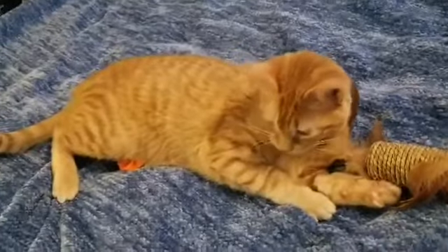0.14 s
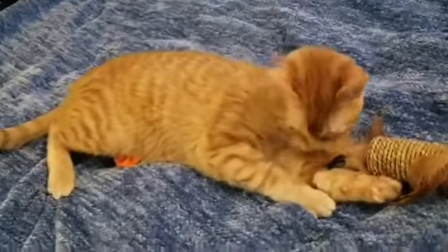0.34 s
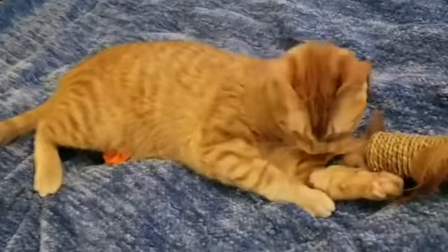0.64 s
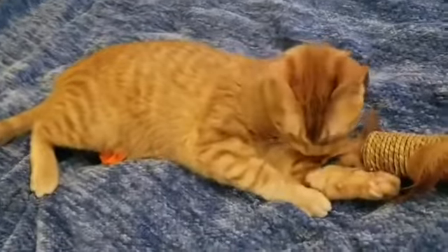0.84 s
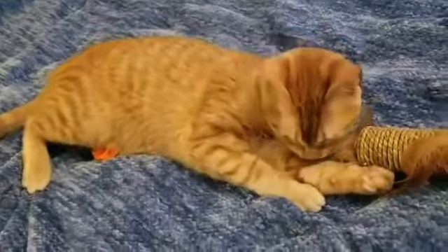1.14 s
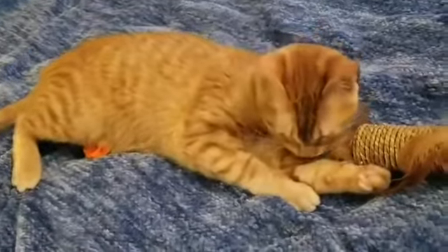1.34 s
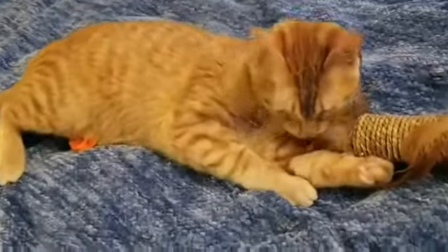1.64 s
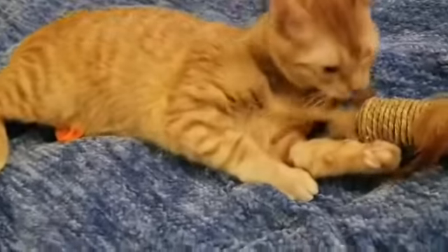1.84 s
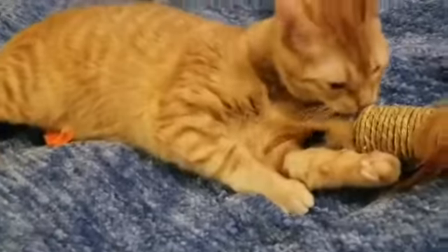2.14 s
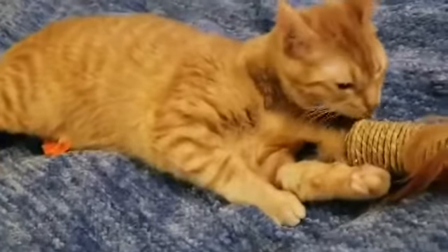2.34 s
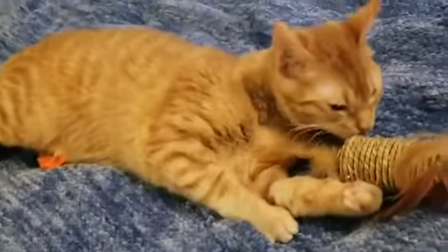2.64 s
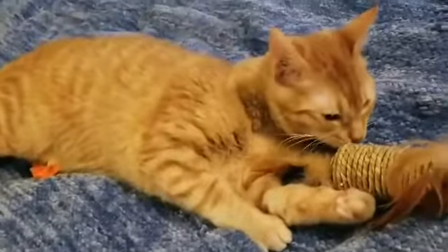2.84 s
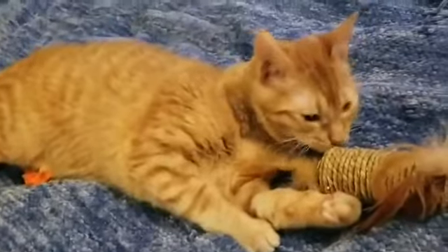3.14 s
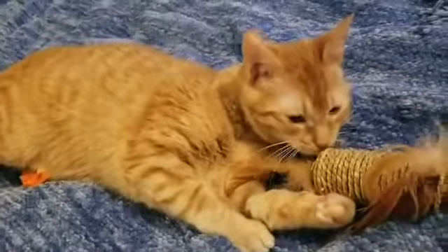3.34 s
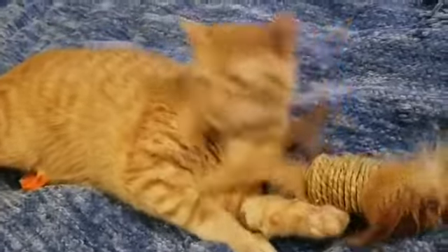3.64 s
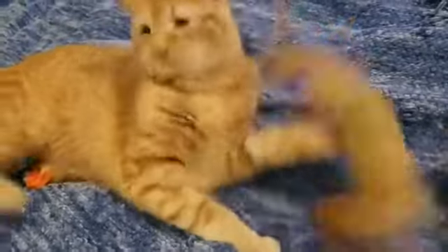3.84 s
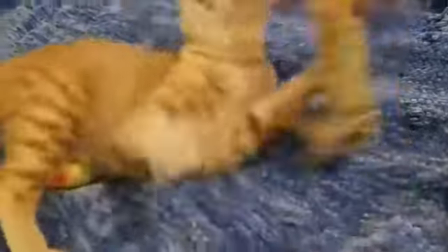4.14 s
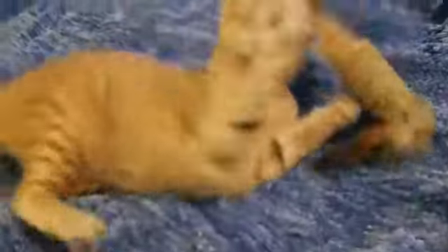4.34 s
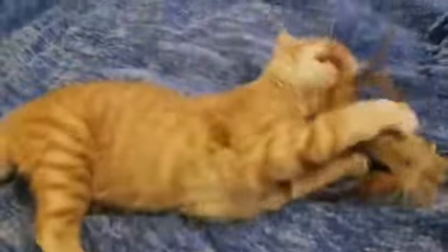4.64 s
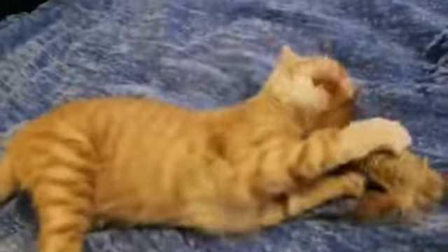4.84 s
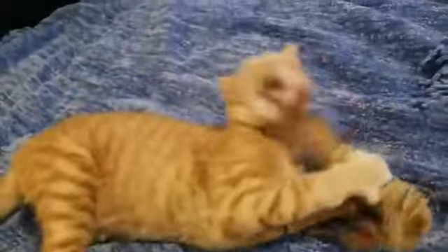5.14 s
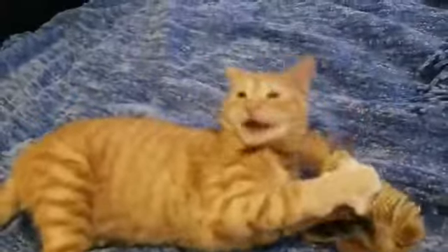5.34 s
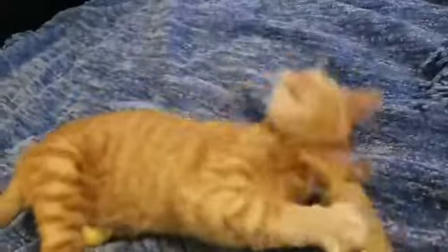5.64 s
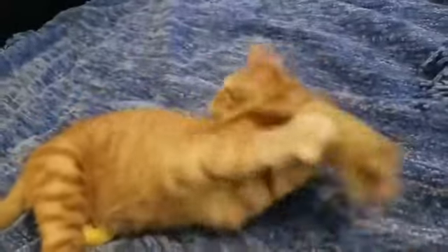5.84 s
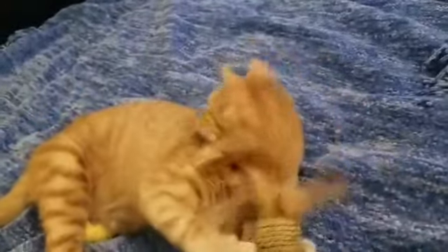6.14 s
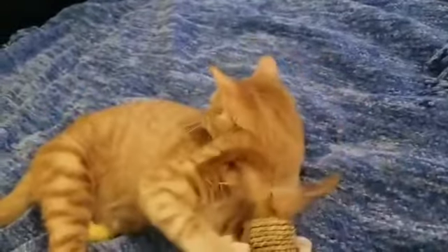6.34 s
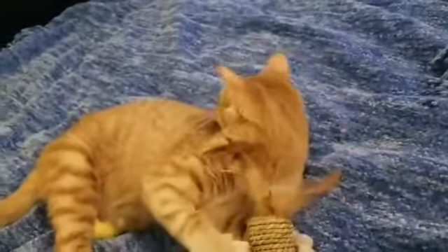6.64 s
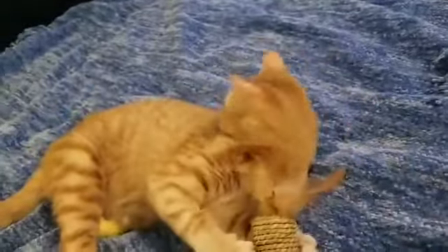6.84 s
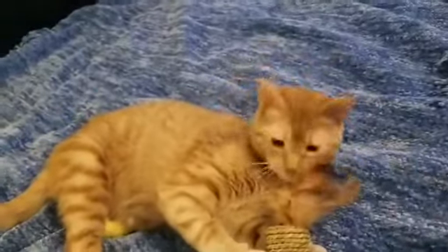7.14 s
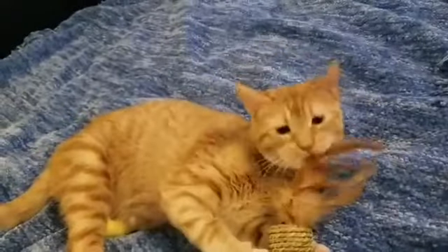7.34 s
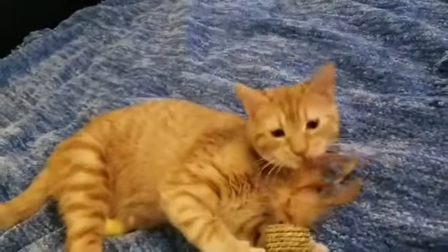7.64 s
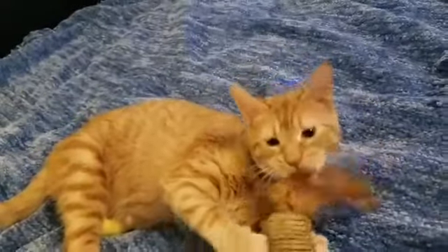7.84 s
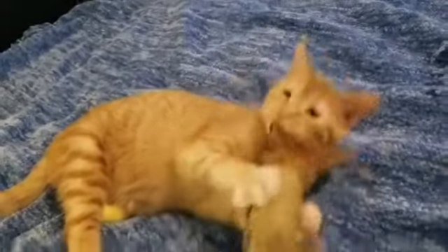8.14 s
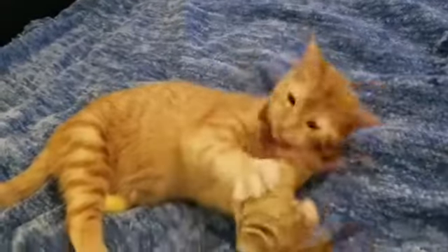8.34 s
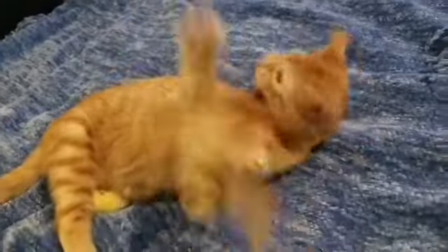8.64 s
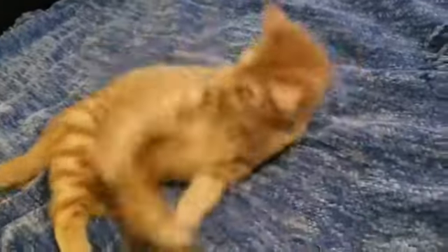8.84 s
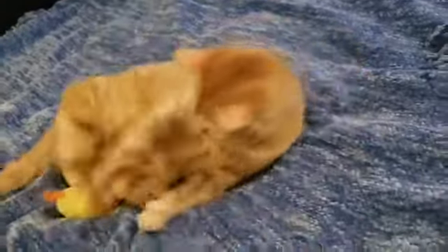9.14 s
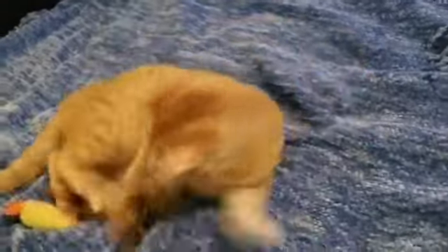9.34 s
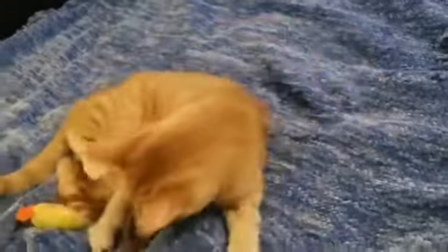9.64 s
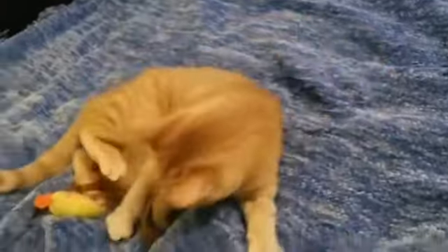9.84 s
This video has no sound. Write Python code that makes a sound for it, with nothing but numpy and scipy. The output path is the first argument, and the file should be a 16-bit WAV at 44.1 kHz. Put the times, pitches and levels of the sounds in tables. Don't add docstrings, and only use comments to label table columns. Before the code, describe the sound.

Very close in a quiet room with a faint low fridge hum, a kitten licks and picks at a rope toy. Tiny bright bell tinkles and dry ticks come first, then a soft bed thud and a lull. Claws snap fibres with stronger jingling, fabric scuffs follow, then teeth crackle through rope with dense jingles, and finally sharp snaps and rustling without bell.

```python
import sys
import numpy as np
from scipy import signal
from scipy.fft import rfft, irfft
from scipy.io import wavfile
from scipy.ndimage import uniform_filter1d

SR = 44100
rng = np.random.default_rng(int(sys.argv[2]) if len(sys.argv) > 2 else 0)


def to_linear_factor(level_db):
    exponent = np.asarray(level_db, float) / 20
    return 10 ** exponent


def persist_wave(psi):
    counts = np.round(np.clip(psi, -1, 1) * 32767).astype(np.int16)
    wavfile.write(sys.argv[1], SR, np.atleast_2d(counts).T)


N = 440118

# frequency in Hz, amplitude in dB.
HUM_PARTIALS = [(119.2, -53), (57, -72.5)]
# frequency in Hz, density in dB per Hz.
AIR_SPECTRUM = [(20, -23), (45, -4), (100, 1.5), (170, -13.5), (300, -13.5), (500, -29.5), (1000, -38),
                (16000, -32)]
# start in seconds, length in seconds, level in dB.
WEIGHT_SHIFTS = [(0.0, 0.0086, -46), (0.483, 0.044, -52.5), (1.49, 0.17, -52), (1.702, 0.079, -45),
                 (2.14, 0.023, -50), (2.37, 0.042, -47.5), (4.005, 0.14, -54.5), (4.39, 0.083, -52),
                 (5.148, 0.098, -58.5), (5.365, 0.042, -54), (6.855, 0.036, -48.5), (7.39, 0.015, -49.5)]
# start in seconds, peak in dB, 60 dB decay time in seconds.
BED_BUMPS = [
    (0.655, -40, 0.19),
    (2.126, -35, 0.26),
    (2.346, -23, 0.22),
]
# start in seconds, length in seconds, fur level in dB,
# body level relative to the fur in dB.
DRAG_STROKES = [(0.0, 0.0063, -46, -4), (0.345, 0.2, -57, 1), (0.663, 0.016, -51, 13.5),
                (0.752, 0.19, -56.5, 1), (1.094, 0.0048, -41, -10), (1.205, 0.25, -63.5, -1),
                (1.479, 0.14, -52.5, 2.5), (1.758, 0.025, -45, -1.5), (2.129, 0.0076, -54.5, 7.5),
                (2.349, 0.0086, -51.5, 14.5), (2.665, 0.19, -56, -10), (3.019, 0.028, -42, -33.5),
                (3.103, 0.13, -56, -28), (3.814, 0.13, -45.5, -22), (3.99, 0.064, -40.5, -8),
                (4.122, 0.17, -46, -4.5), (4.386, 0.015, -44.5, -5), (4.53, 0.054, -46, -11.5),
                (4.634, 0.38, -66.5, 3), (5.115, 0.43, -50, -19.5), (5.548, 0.35, -53.5, -17),
                (5.948, 0.17, -41, -22.5), (5.634, 0.023, -49.5, -1), (6.134, 0.026, -54.5, 6),
                (6.633, 0.12, -60.5, -32), (6.824, 0.27, -46, -22), (7.227, 0.21, -49.5, -34),
                (7.5, 0.5, -48.5, -27.5), (8.026, 0.27, -56, -33), (8.822, 0.01, -32, -7.5),
                (8.951, 0.029, -38, -15.5), (9.15, 0.022, -45.5, -9.5), (9.283, 0.22, -46, -5),
                (9.59, 0.035, -96, -20)]
# start in seconds, peak in dB, low band in dB,
# high band in dB.
CLAW_AND_TEETH_SNAPS = [(0.1029, -37.5, 2, 14), (0.1138, -32, -1.5, -13), (0.8525, -26.5, -4, 13),
                        (0.9721, -30, -8, -5.5), (1.0005, -32.5, 0.5, -23.0), (1.1017, -29.5, -29, -1),
                        (1.2609, -33, -9, 7.5), (1.2901, -26.5, -1.5, -11), (2.127, -38, 13.5, 3.5),
                        (2.3436, -48.5, 28.5, 25), (2.3518, -29.5, 9, -2.5), (2.8499, -45.5, 12, 12),
                        (2.9996, -25.5, 5.5, -10), (3.009, -25.5, -18.5, 11.5), (3.0203, -26.5, -12.5, -4),
                        (3.0301, -28, -3, -8), (3.0699, -27, 0.5, 6), (3.9503, -24, -44, -8), (3.9808, -18.5, 3, -3),
                        (3.994, -21, -1.5, -26), (4.006, -21, 1, -14), (4.0172, -19, 2.5, -12),
                        (4.0352, -27.5, 12, -11), (4.0408, -17, -15.5, -20), (4.0522, -20.5, 4.5, 0),
                        (4.527, -47, -18, 2),
                        (5.045, -38, 1, 5), (5.169, -37, 8.5, 7), (5.206, -26, -28, -1), (5.2959, -34, -15, 15),
               (5.9606, -21, -40, -34), (5.9969, -37.5, 16.5, -43), (6.023, -28, -7.5, -4.5),
               (6.1672, -32, 14, -16), (6.602, -30.5, -6.5, -5.5), (6.6914, -26.5, -35, -6.5),
               (6.7077, -31, -5, -5), (6.826, -26, -32, 4.5), (6.944, -19.5, -41, -1),
               (6.9678, -28, -26, 7), (7.002, -30, -34, -0.5), (7.0612, -39.5, -12, 13.5),
               (7.096, -31.5, -30, 2), (7.23, -30, -32, -17), (7.687, -27.5, -38, -3),
               (7.7017, -45, 6, -17.5), (7.809, -42.5, 11.5, -6.5), (6.934, -29.5, -1, -3.5),
               (7.921, -38.5, -8, 3.5), (7.9404, -29.5, -22, -2.5), (7.9583, -25, -14.5, -0.5),
               (8.0597, -32.5, -35, -3.5), (8.821, -34, 14, 0), (8.828, -19.5, 10, -15), (8.834, -12, 4, 3),
               (8.863, -42, -2, 24), (8.9458, -27.5, 8.5, -14.5), (8.9744, -28, 6.5, -14),
               (9.274, -31, 8, 2),
                        (0.0405, -41.5, -7.5, 9), (0.1502, -59, -5, -9.5), (0.209, -63, -6, -4),
                (0.225, -40, 1, -18), (0.38, -42.5, -16, -14.5), (0.401, -46, -8, -9.5),
                (0.626, -46.5, -4, -17), (0.653, -37, -5, -18.5), (0.6868, -40.5, -11, -2),
                (0.6952, -34, 8, -17.5), (0.7726, -38, -15, -9), (0.7866, -30.5, 2, -20),
                (0.797, -34.5, 3, 5), (0.94, -42, -1, -17), (0.8735, -35, 14, -11.5),
                (1.049, -44, -9, -10.5), (1.187, -42, -22, 2), (1.2306, -35.5, -8, -9),
                (1.3245, -43, -3.5, -13), (1.407, -39, -4, -7), (1.431, -45.5, 3, 14),
                (1.622, -45, -13.5, -20), (1.7458, -39.5, -17, -24), (2.6798, -43.5, 3, -19.5),
                (2.737, -47.5, 0.5, 0.5), (2.9106, -49.5, 2.5, -17), (2.9512, -44.5, -4, -12.5),
                (3.1271, -31.5, -9, 6.5), (3.2252, -61, -7, -7), (3.89, -36, -18, -25),
                (4.2152, -37, -6.5, -15), (4.2399, -32, -4, -29), (4.392, -47, -18, -18),
                (4.399, -43, -35, -26), (5.1186, -38.5, -14.5, -19), (5.1463, -37.5, -24, -4),
                (5.2128, -26.5, -2.5, -18), (5.2302, -45, -13, -5), (5.269, -37, -7, 8),
                (5.3624, -42, 4, -11), (5.3832, -38.5, -2, -12), (5.42, -39.5, 4, -9),
                (5.4364, -37, -13, 1.5), (5.448, -45, -10, -8.5), (5.593, -42, -19, -15.5),
                (5.6323, -29, -27, -19.5), (5.647, -33.5, -3, -19),
                        (5.8363, -36.5, 3, -8), (5.8735, -36.5, -20, -27), (5.933, -45, -23, -15.5),
              (5.9497, -37, -30, -24), (6.068, -44, 9, -19), (6.089, -49, -9, -23), (6.122, -32, -7.5, -19),
              (6.4928, -40, 3, -16), (6.642, -32, -13, -5), (6.658, -36, -6, -6.5), (6.8523, -35, 7, 18),
              (7.033, -34, -21, -2), (7.1321, -31, -7, -7), (7.203, -42, -24, -4), (7.267, -38, -15.5, 5),
              (7.334, -34, -4.5, -13), (7.389, -36, -17.5, 7), (7.4127, -41.5, 18, -5),
              (7.5026, -32, -27, -13.5), (7.5223, -35, -24, -5.5), (7.565, -31, -17, -11.5),
              (7.6131, -38.5, -11, -1), (7.6326, -34, -17, -13.5), (7.6903, -25.5, -10, 2),
              (7.776, -45, -16, -4), (7.796, -35, -22.5, -6), (7.8153, -26, -29, -11),
              (7.8413, -38.5, -12, -14), (7.862, -30.5, -33, -17), (7.905, -31.5, -17, -1),
              (8.0175, -31, -13, -16), (8.2516, -44, -19, -21), (9.1546, -40, -21, -37),
              (9.1748, -38.5, -21, -31), (9.278, -36, 14.5, -28), (9.3774, -41.5, -13, -19)]
FIBRE_SNAPS = CLAW_AND_TEETH_SNAPS
# start in seconds, peak in dB, lower mode in
# dB, 60 dB decay time in seconds.
PELLET_STRIKES = [(0.0432, -36.5, -10, 0.08), (0.079, -45, 3, 0.045), (0.1030, -13.5, -15.5, 0.014),
                  (0.1138, -38, -16, 0.013), (0.1530, -21.5, -17, 0.082), (0.1622, -21, -27.5, 0.076),
                  (0.3442, -38.5, -41.5, 0.025), (0.3987, -41, 3, 0.0094), (0.4643, -37, 2.5, 0.011),
                  (0.6275, -38, -9, 0.097), (0.6504, -34, -26, 0.2), (0.679, -38, -11, 0.05),
                  (0.8537, -17, -14, 0.032), (0.9375, -30.5, -8, 0.067), (0.9998, -41, -11, 0.062),
                  (1.1305, -36, -7, 0.18), (1.1475, -36, -23, 0.051), (1.1888, -38.5, -1, 0.031),
                  (1.2331, -37, -25, 0.028), (1.29, -22, -15, 0.03), (1.3128, -40, -8.5, 0.027),
                  (1.5055, -35, 2, 0.072), (1.5689, -45, -1, 0.13), (1.61, -33, -11, 0.038),
                  (1.6216, -43, -9, 0.05), (1.7082, -36.5, -6.5, 0.085), (1.7424, -46, -5, 0.055),
                  (1.8397, -39, -10, 0.11), (1.9265, -47, -6, 0.23),
                  (2.321, -53, -10, 0.025), (2.734, -41, -18, 0.037), (2.7457, -35, -9, 0.072),
                   (2.85, -31, -10, 0.031), (2.867, -38, -16, 0.33), (2.896, -36.5, -29, 0.057),
                   (2.909, -43, -3, 0.11), (2.9511, -29.5, -38, 0.031), (3.005, -26.5, 3, 0.041),
                   (3.0205, -18, -17, 0.28), (3.0566, -19.5, -21, 0.098), (3.072, -28.5, 2, 0.015),
                   (3.0964, -34, -13, 0.042), (3.129, -16, -13, 0.056), (3.15, -35.5, -3, 0.11),
                   (3.225, -31, -6, 0.046), (3.3448, -61, 3, 0.22), (3.6134, -45, -25, 0.044),
                   (3.659, -55, -24, 0.097), (5.1194, -58, -7, 0.06), (5.207, -45.5, 4, 0.12),
                   (5.2951, -23, -20, 0.0072), (5.334, -31.5, -24, 0.028), (5.484, -38, -30.0, 0.12),
                   (5.5517, -30.5, -35, 0.077), (6.347, -69, -14, 0.062), (6.392, -53, -16, 0.073),
                  (6.466, -43.5, -1.5, 0.046), (6.6664, -35.5, -30, 0.0089), (6.743, -46.5, -6, 0.047),
                   (6.8, -38.5, -12, 0.25), (6.826, -33, 2, 0.021), (6.8533, -24, -1, 0.058),
                   (6.876, -25, -1, 0.049), (6.906, -31.5, -26.5, 0.13), (6.942, -20.5, -0.5, 0.024),
                   (6.9662, -33, -4, 0.031), (6.983, -32.5, -2.5, 0.045), (7.032, -29.5, -12.5, 0.016),
                   (7.0629, -32.5, -14.5, 0.14), (7.1, -21.5, -17.5, 0.01), (7.1122, -29.5, -12.5, 0.15),
                   (7.1399, -30.5, -7.5, 0.047), (7.2244, -45, -6, 0.24), (7.281, -38.5, -14, 0.045),
                   (7.392, -27.5, -34, 0.018), (7.431, -30.5, -9, 0.12), (7.4408, -30.5, -24, 0.037),
                   (7.511, -31, -28, 0.1), (7.531, -34.5, -33.5, 0.026), (7.561, -31, -16, 0.044),
                   (7.6345, -29.5, -27, 0.035), (7.687, -30, -5, 0.12), (7.717, -14.5, -25.5, 0.05),
                   (7.7340, -21.5, -17, 0.044), (7.7956, -41.5, 12.5, 0.021), (7.9228, -21, -38, 0.0088),
                  (0.2116, -35.5, -8.5, 0.015), (0.7237, -42.5, -9, 0.036), (0.736, -51.5, 13, 0.11),
              (0.7682, -41, -9.5, 0.06), (0.877, -29, -11.5, 0.04), (1.054, -43.5, -23, 0.068),
              (1.2206, -45, -16.5, 0.032), (1.26, -41, -19, 0.036), (1.4783, -44, -10.5, 0.06),
              (2.509, -50, -0.5, 0.04), (2.8137, -46, -12, 0.066), (5.1675, -36, -13.5, 0.033),
              (5.23, -46, 0.5, 0.04), (5.3096, -39.5, -10.5, 0.058), (5.449, -43, -19.5, 0.039),
              (5.7287, -67, -23, 0.066), (6.371, -65, -29, 0.033), (6.417, -56, -10.5, 0.022),
              (6.5036, -49, -12, 0.028), (6.725, -42, -6, 0.038), (7.3474, -42, -3, 0.055),
              (7.379, -47.5, -11, 0.04), (7.415, -38, -9, 0.037), (7.589, -44, -19, 0.0395),
              (7.7654, -46, -16, 0.03), (7.8145, -38, -10, 0.083), (7.8644, -39.5, -9, 0.089),
              (7.9402, -31, -24, 0.05), (8.113, -51, -26.5, 0.047)]
STRIKES = sorted(PELLET_STRIKES)
# frequency in Hz, level in dB, share of the strike's decay time.
SHELL_MODES = [(9825, -5, 0.96), (9837, -13, 0.23), (9780, -9, 0.98), (12250, -33.5, 0.42),
               (5680, -32.5, 0.279)]
LOWER_MODE_HZ = 8808
# time in seconds, left minus right in dB.
SLOT_DIRECTION = [(0.0, -2), (0.84, -9.5), (1.1, 0), (1.35, -5), (1.96, 3), (2.73, -3), (2.89, 3),
                  (3.27, 4.5), (5.21, 10), (5.35, 23), (6.3, 2), (6.96, 5), (7.2, 10), (7.96, 2.5)]
# frequency in Hz, left in dB, right in dB.
PORT_RESPONSES = [(150, 3, 3.5), (436.5, 0.5, 0), (950, 2, 2.5), (1477, -1, -1.5), (2350, 0.5, 11),
                  (2670, 5.5, 17), (3103, 2.5, 14.5), (3810, 5, 2.5), (4200, 5.5, 10), (6145, 4, 4),
                  (8490, -1, -2.5), (9430, 1, -0.5), (13030, 2, 3.5), (12850, -5, -4.5), (16200, -23, -28)]


def level(x, db):
    return x * to_linear_factor(db) / np.sqrt(np.mean(x ** 2))


def curves(table):
    s, *columns = np.transpose(table)
    return [np.interp(np.arange(N) / SR, s, c) for c in columns]


def colour(x, hz, db):
    f = np.maximum(np.arange(N // 2 + 1) * SR / N, 1)
    return irfft(rfft(x) * to_linear_factor(np.interp(np.log(f), np.log(hz), db)), N)


def band(x, lo_hz, hi_hz):
    return signal.sosfilt(signal.butter(2, [lo_hz, hi_hz], "band", fs=SR, output="sos"), x)


def sides(pan_db):
    return np.sqrt(2 / (1 + to_linear_factor(2 * np.array([[-1], [1]]) * pan_db)))


def walk(rate):
    hold = int(SR / rate)
    steps = rng.standard_normal(N // hold + 1)
    return uniform_filter1d(np.repeat(steps, hold), hold)[:N]


def grains(rate, spread_db, tail_s):
    size = (rng.random(N) < rate / SR) * to_linear_factor(spread_db * np.minimum(rng.exponential(size=N), 5))
    envelope = signal.lfilter([1], [1, -np.exp(-1 / (tail_s * SR))], size)
    return level(envelope * (rng.standard_normal(N) + 2.07 * rng.standard_normal((2, N))), 0)


def swells(s, length_s, db, rise_db_s, fall_db_s, rest_db):
    t = np.arange(0, N, 64)[:, None] / SR
    rise = rise_db_s * np.maximum(s - t, 0)
    fall = fall_db_s * np.maximum(t - s - length_s, 0)
    power = np.sum(to_linear_factor(db - rise - fall) ** 2, axis=1) + to_linear_factor(rest_db) ** 2
    return np.interp(np.arange(N) / SR, t[:, 0], np.sqrt(power))


def add(out, s, sound):
    i = int(s * SR)
    out[:, i:i + sound.shape[-1]] += sound[..., :N - i]


def room():
    t = np.arange(N) / SR
    hum = sum(to_linear_factor(db + walk(2.6)) * np.sin(2 * np.pi * hz * t) for hz, db in HUM_PARTIALS)
    hz, db = np.transpose(AIR_SPECTRUM)
    shared = colour(rng.standard_normal(N), [250, 1000], [0, -20])
    own = colour(rng.standard_normal((2, N)), [60, 250, 1000], [-20, -8, 0])
    return hum + to_linear_factor(walk(1.7)) * level(colour(shared + own, hz, db), -60.5)


def bed():
    push = rng.standard_normal(N) + 0.086 * rng.standard_normal((2, N))
    boom = colour(push, [20, 50, 100, 163, 200, 500, 1500], [-6, 1, -5.5, 1, -14, -18.5, -42])
    boom = level(boom, 0)
    gain = swells(*np.transpose(WEIGHT_SHIFTS), rise_db_s=172.5, fall_db_s=112.5, rest_db=-66.5)
    out = gain * to_linear_factor(2.2 * walk(16)) * boom
    knock = band(boom, 500, 940) + to_linear_factor(-29) * band(push, 2400, 2700)
    knock_db, knock_t60_share = 9.5, 0.36
    t = np.arange(SR // 3) / SR
    for s, db, t60 in BED_BUMPS:
        now = slice(int(s * SR), int(s * SR) + len(t))
        add(out, s, to_linear_factor(db - 60 * t / t60) * (1 - np.exp(-t / 0.011)) * boom[:, now])
        add(out, s, to_linear_factor(db + knock_db - 60 * t / (knock_t60_share * t60)) * knock[:, now])
    return out


def drag():
    s, length_s, db, body_db = np.transpose(DRAG_STROKES)
    rise_db_s, fall_db_s, stir_db, stir_body_db = 904, 160, -63.5, -8.5
    fur_gain = swells(s, length_s, db, rise_db_s, fall_db_s, -np.inf)
    body_gain = swells(s, length_s, db + body_db, rise_db_s, fall_db_s, stir_db + stir_body_db)

    brush = to_linear_factor(-1.5 + 3 * walk(60)) * colour(rng.standard_normal((2, N)), [3000, 12000], [0, -6])
    fibres = grains(400, 2.6, 0.0014) + brush
    fur = 0
    for k in range(6):
        fur = fur + to_linear_factor(2.9 * walk(50) - 0.44 * k) * band(fibres, 1300 * 1.5 ** k, 1950 * 1.5 ** k)

    cloth = grains(500, 2.5, 0.006) + to_linear_factor(3 * walk(18)) * rng.standard_normal(N)
    shove = sum(to_linear_factor(3 * walk(35)) * band(cloth, *edges) for edges in ((430, 1000), (850, 1600)))
    stir = level(band(rng.standard_normal((2, N)), 1100, 10000), stir_db - 10.5)
    return stir + fur_gain * level(fur, -8) + body_gain * level(shove, -7.5)


def snaps():
    out = np.zeros((2, N))
    t = np.arange(SR // 30) / SR
    fade = (1 - np.exp(-t / 0.00027)) * (np.exp(-t / 0.0015) + 0.038 * np.exp(-t / 0.014))
    count = len(FIBRE_SNAPS)
    noise = rng.standard_normal((count, len(t))) + 1.25 * rng.standard_normal((2, count, len(t)))
    burst = noise * fade
    low, mid, high = band(burst, 700, 3670), band(burst, 3600, 9560), band(burst, 10300, 12960)
    mid = mid + to_linear_factor(3 + 6 * np.tanh(noise[0, :, :1])) * band(burst, 4900, 6000)
    low, mid, high = (x / np.abs(x).max(axis=(0, 2), keepdims=True) for x in (low, mid, high))
    for k, (s, db, low_db, high_db) in enumerate(FIBRE_SNAPS):
        crack = to_linear_factor(low_db - 9) * low[:, k] + mid[:, k] + to_linear_factor(high_db - 1) * high[:, k]
        add(out, s, to_linear_factor(db - 1.5) * crack)
    return out * sides(-0.54)


def patter():
    times, peaks_db = np.transpose(STRIKES)[:2]
    gain = swells(times, 0, -63 + 0.2 * (peaks_db + 17), rise_db_s=1500, fall_db_s=150, rest_db=-108)
    impacts = grains(200, 2.4, 0.0001)
    out = np.zeros((2, N))
    modes = ((SHELL_MODES[0][0], 0, 0.03), (SHELL_MODES[2][0], -2, 0.03),
             (LOWER_MODE_HZ, -13, 0.03), (SHELL_MODES[-1][0], -9, 0.012))
    for hz, db, t60 in modes:
        pole = np.exp(2j * np.pi * hz / SR - np.log(1000) / (t60 * SR))
        out += gain * to_linear_factor(db) * level(signal.lfilter([1], [1, -pole], impacts).imag, 10)
    return out


def bell():
    pan_db, = curves(SLOT_DIRECTION)
    out = patter()
    chance = rng.standard_normal((len(STRIKES), 4, len(SHELL_MODES) + 1, 1))
    ends = [row[0] for row in STRIKES[1:]] + [N / SR]
    t = np.arange(SR // 50) / SR
    clicks = band(rng.standard_normal((len(STRIKES), 2, len(t))) * np.exp(-t / 0.0013), 6700, 14000)
    for (s, db, lower_db, t60), end, click, luck in zip(STRIKES, ends, clicks, chance):
        detune, mix, turn, lag = luck
        t = np.arange(int(SR * min(end - s + 0.03, 0.2))) / SR
        modes = SHELL_MODES + [(LOWER_MODE_HZ, lower_db, 0.9)]
        hz, mode_db, share = np.transpose(modes)[:, :, None]
        varied_db = mode_db + 1.9 * mix * (mode_db < -5)
        fade = to_linear_factor(varied_db - 60 * t / (share * np.clip(t60, 0.01, 0.3)))
        phase = 2 * np.pi * hz * (1 + 0.0027 * detune) * t + 0.87 * turn
        skew = 1.05 * np.tanh(lag)
        ring = np.array([np.sum(fade * np.sin(phase + side * skew), axis=0) for side in (1, -1)])
        ring *= (1 - np.exp(-t / 0.00015)) ** 2 * (0.74 + 0.5 * np.exp(-t / 0.0016))
        ring *= np.exp(-np.maximum(t - (end - s), 0) / 0.0072)
        add(out, s, to_linear_factor(db + 5.5) * ring)
        add(out, s, to_linear_factor(0.49 * db - 13) * click)
    return out * sides(pan_db)


def apart(x):
    return np.array([x[0], np.roll(x[1], 6)])


def scene():
    far = apart(room() + bed())
    near = drag() + snaps() + bell()
    t = np.arange(SR // 5) / SR
    walls = rng.standard_normal((2, len(t))) * to_linear_factor(-35.5 - 60 * t / 0.15) * (t > 0.003)
    echo = signal.fftconvolve(near.mean(axis=0)[None], walls, axes=1)[:, :N]
    return far + near + echo


def thin_faint(x, size, spread, axis, gate_db, top_hz, quiet_db):
    hz, _, z = signal.stft(x.astype(np.float32), SR, nperseg=size)
    hz = hz[:, None]
    local = np.sqrt(np.abs(uniform_filter1d(np.abs(z) ** 2, size=1 + size // 90, axis=1)))
    around = uniform_filter1d(local, size=spread, axis=axis)
    keep = (local > np.maximum(around * to_linear_factor(gate_db), to_linear_factor(quiet_db))) | (hz < 3200)
    keep &= (local > around * to_linear_factor(7.5)) | (hz < top_hz)
    thinned = z * np.maximum(keep, np.float32(0.003))
    return signal.istft(thinned, SR, nperseg=size)[1][:, :N].astype(float)


def top_cut(x):
    return signal.sosfilt(signal.butter(12, 16100, fs=SR, output="sos"), x)


def record(dry):
    hz, *ports = np.transpose(PORT_RESPONSES)
    heard = np.array([colour(x, hz, db) for x, db in zip(dry, ports)])
    heard = thin_faint(heard, size=1024, spread=110, axis=1, gate_db=-6.1, top_hz=SR, quiet_db=-97.5)
    heard = thin_faint(heard, size=512, spread=9, axis=2, gate_db=-9.5, top_hz=13100, quiet_db=-np.inf)
    return top_cut(heard)


dry = scene()
out = record(dry)
persist_wave(out)
```